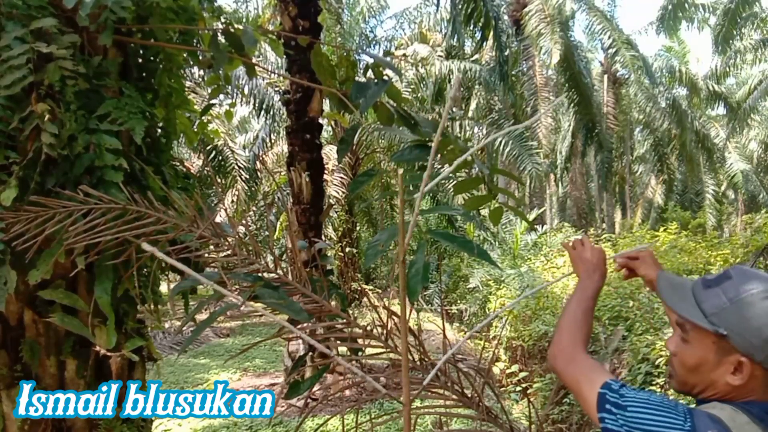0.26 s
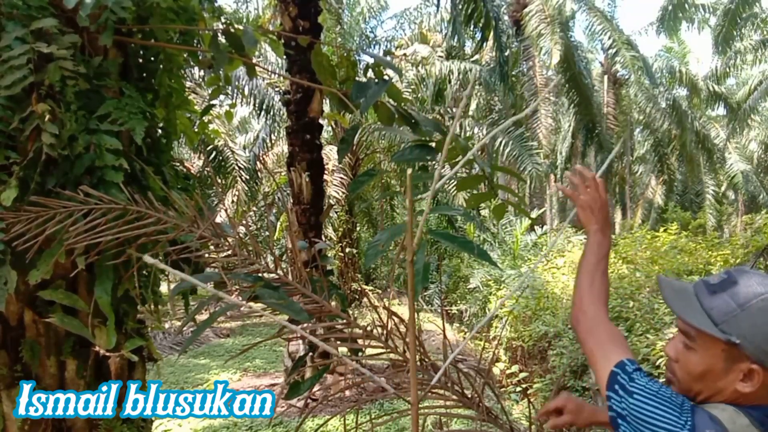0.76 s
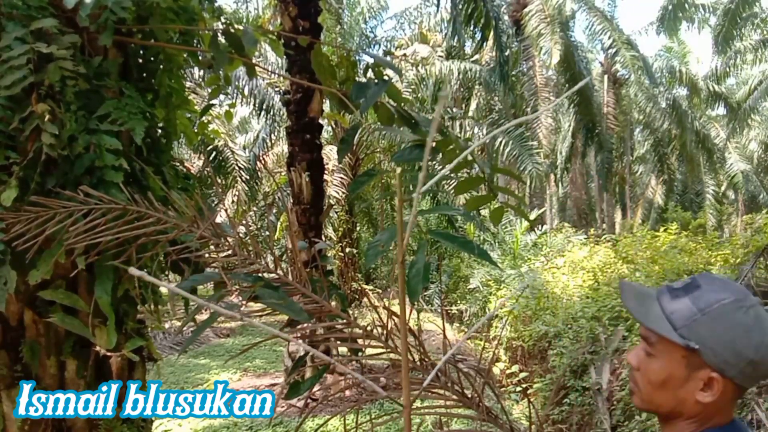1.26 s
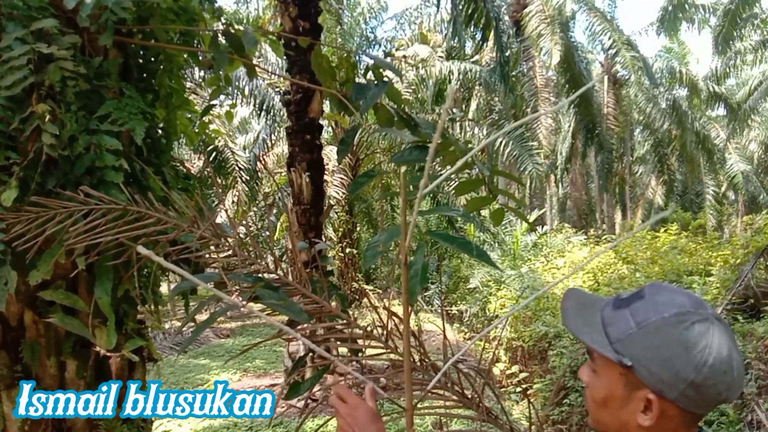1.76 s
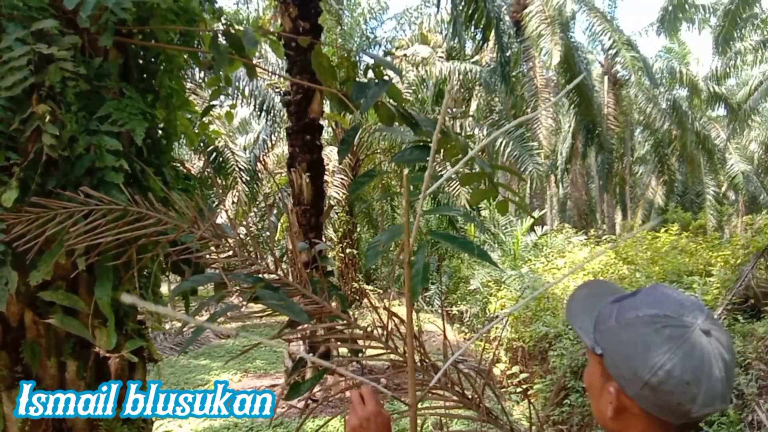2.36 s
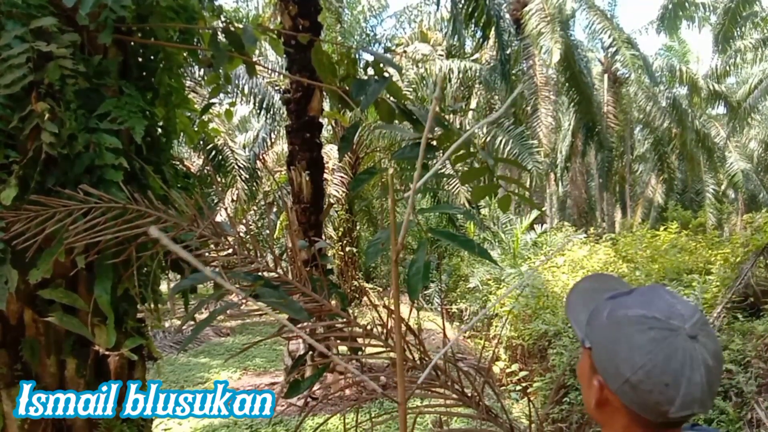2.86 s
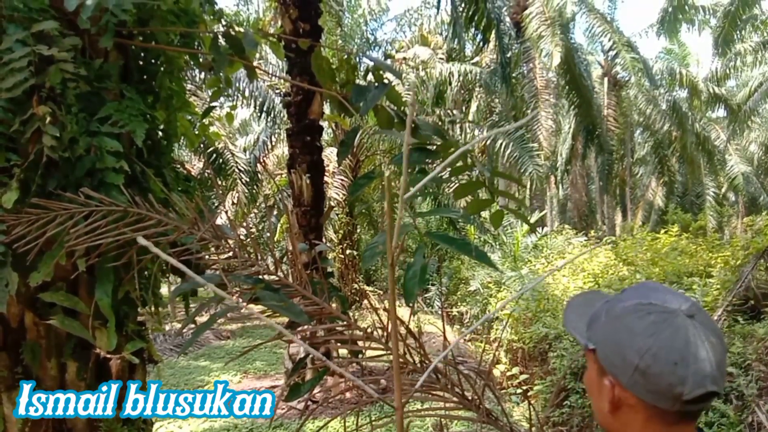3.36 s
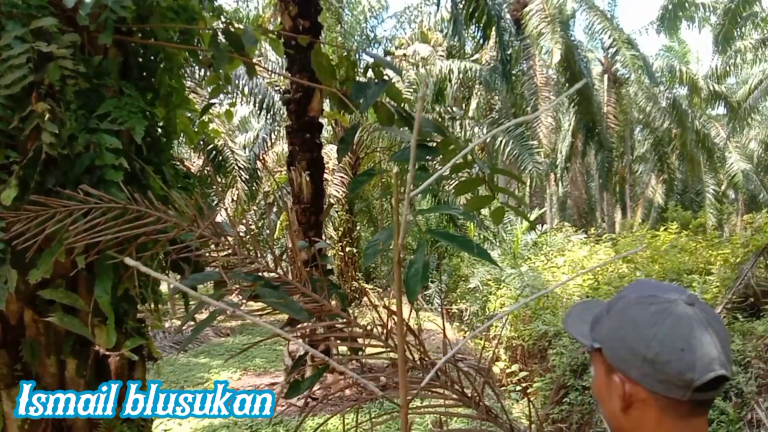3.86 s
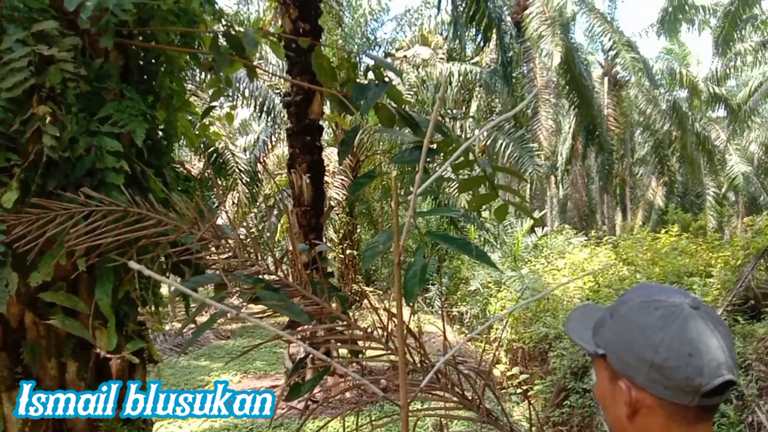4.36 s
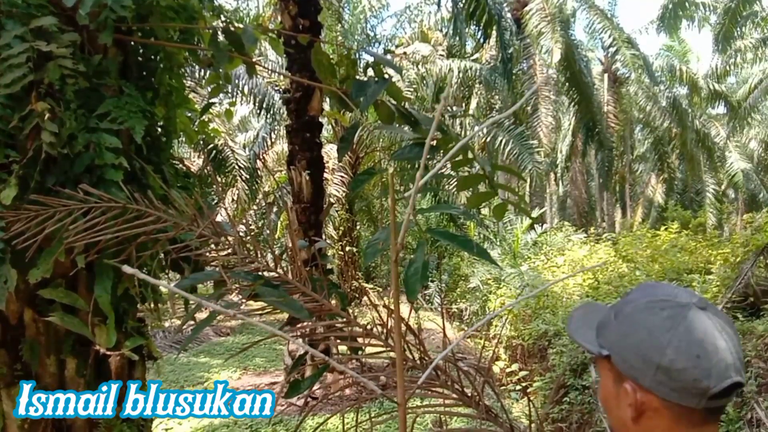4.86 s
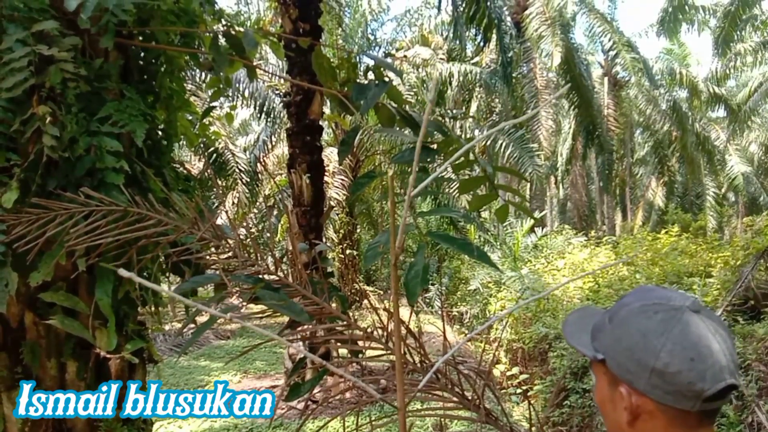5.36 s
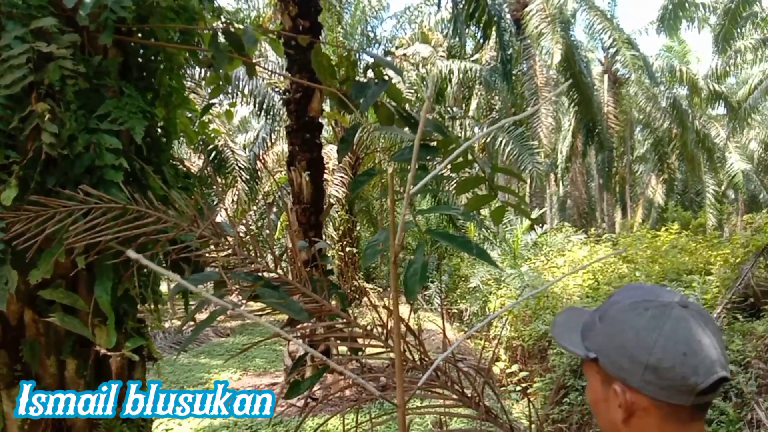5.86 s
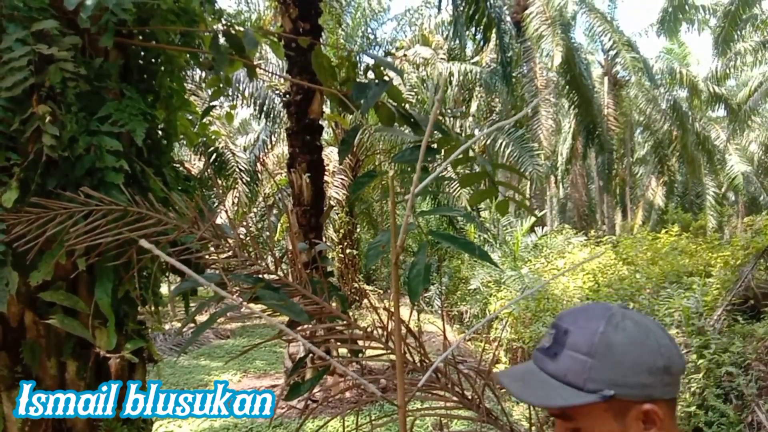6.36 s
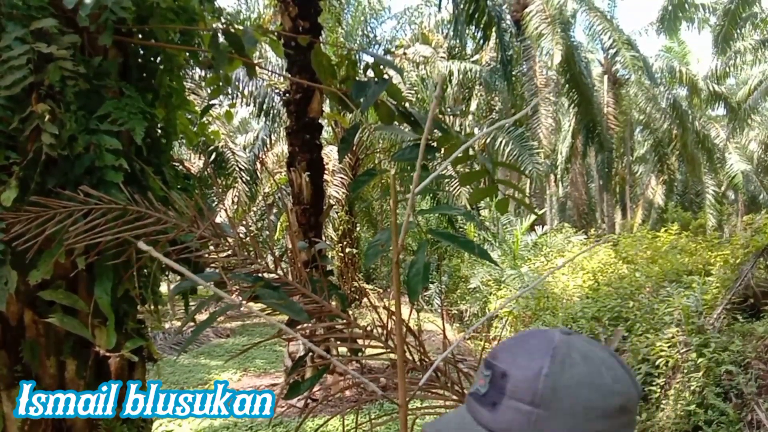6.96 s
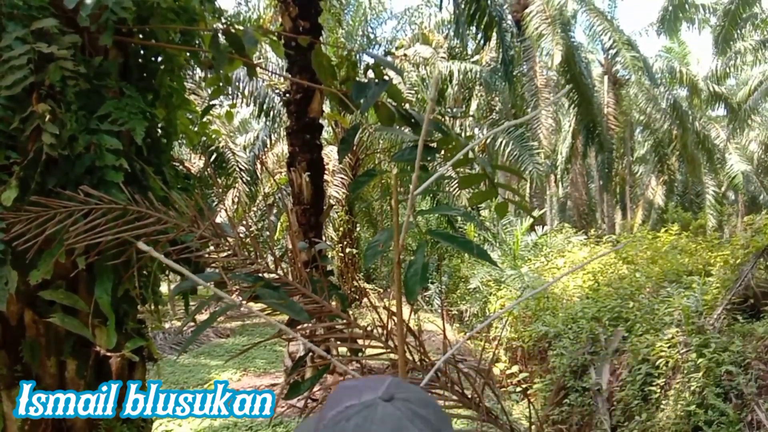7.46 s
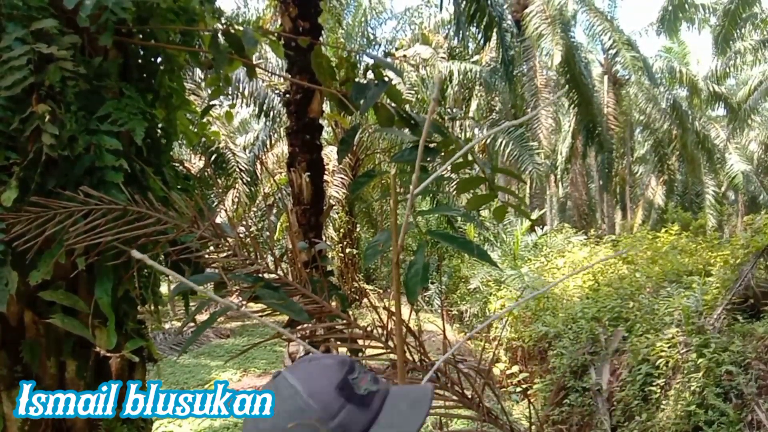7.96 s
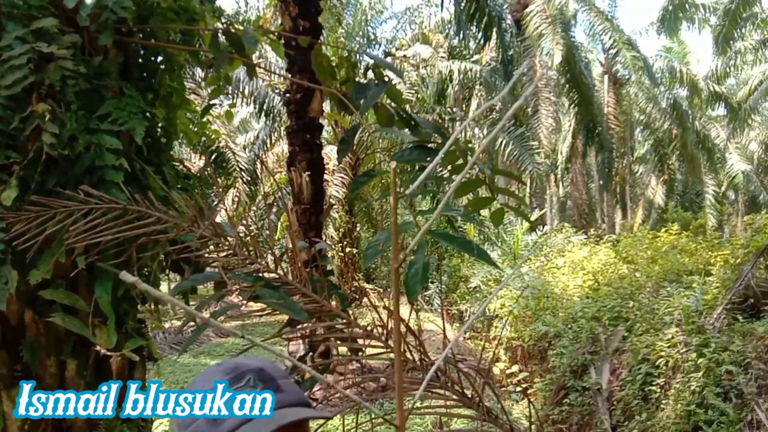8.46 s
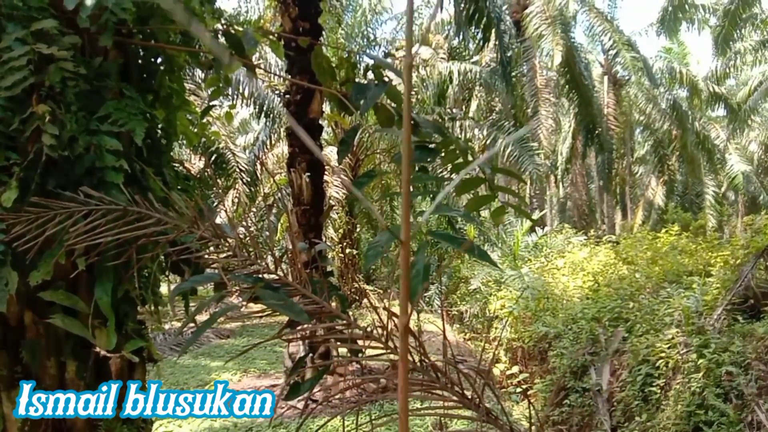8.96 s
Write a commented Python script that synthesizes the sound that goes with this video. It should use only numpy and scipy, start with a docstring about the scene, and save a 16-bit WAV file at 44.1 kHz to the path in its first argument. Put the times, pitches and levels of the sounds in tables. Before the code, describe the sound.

A quiet palm grove is heard through a hand-held microphone, with faint low air and a soft, high, steady shrill of insects throughout. A distant bird gives a thin high note followed by a lower raspy chirp at about 1 second, twice around 3.3 seconds and twice around 5.5 seconds. Dry fronds tick faintly. Soft low handling bumps and rumble come and go, mostly between 3.4 and 5 seconds, again near 6.3 and 9. At about 7.2 seconds a small loudspeaker close by cuts in with a hiss that continues to the end. From about 8 seconds it plays a songbird's quick run of five rising, gliding whistles, alternating high and lower, the first softer and the rest by far the loudest sounds. They echo briefly off the ground and trunks, finishing just after 9 seconds. A twig snaps and fronds rustle near 8.4 seconds.

```python
"""Insects shrill softly in a quiet palm plantation; a far bird calls, dry fronds rustle and hands bump
the camera. Then a small decoy loudspeaker close to the microphone cuts in with a hiss and plays a
songbird's quick run of rising whistles, which flare wherever their pitch crosses a resonance of the cone.
The ground and the trunks throw the notes back, and the microphone's limiter holds down the loudest."""
import sys
import numpy as np
from scipy import signal
from scipy.io import wavfile
from scipy.ndimage import uniform_filter1d

SR = 44100
rng = np.random.default_rng(int(sys.argv[2]) if len(sys.argv) > 2 else 0)


def to_wav(s):
    """Save 16-bit WAV."""
    ch = np.atleast_2d(s).T  # columns
    pcm = np.round(np.clip(ch, -1, 1) * 32767)  # PCM
    wavfile.write(sys.argv[1], SR, pcm.astype(np.int16))


N = 406161
T = np.arange(N) / SR


def gain_of(db):
    """Decibels to a factor."""
    return 10 ** (np.asarray(db) / 20)


def unit_rms(x):
    """Scales to an rms of 1."""
    return x / np.sqrt(np.mean(x ** 2) + 1e-20)


def at_frequency(points, hz):
    """Reads a curve on a log-frequency axis."""
    point_hz, value = np.transpose(points)
    return np.interp(np.log(hz + 1), np.log(point_hz + 1), value)


def fader(curve):
    """Points of time_s, level_db as a gain for every sample."""
    return gain_of(np.interp(T, *np.transpose(curve)))


def bell(middle_s, width_s):
    """A smooth swell of height 1."""
    return np.exp(-((T - middle_s) / width_s) ** 2)


def add(mix, start_s, sound):
    """Mixes a sound in at its start time."""
    part = mix[round(start_s * SR):][:len(sound)]
    part += sound[:len(part)]


def bandpass(x, band_hz, order=2):
    """Keeps the band between two frequencies."""
    return signal.sosfilt(signal.butter(order, band_hz, "band", fs=SR, output="sos"), x)


def drift(t, rate_hz):
    """A random wander of rms 1, no faster than rate_hz."""
    speed_hz, offset = rate_hz * rng.uniform(0.18, 1, (2, 16, 1))
    return np.sin(2 * np.pi * (speed_hz * t + rng.random(offset.shape))).sum(0) / np.sqrt(8)


def noise(spectrum, patchy_db):
    """Coloured noise of rms 1 whose strength wanders in patches of time and frequency."""
    frames, hz = N // 512 + 5, np.fft.rfftfreq(2048, 1 / SR)
    real, imag, patches = rng.standard_normal((frames, len(hz), 3)).T
    patches = uniform_filter1d(patches, size=18, axis=0)
    patches = unit_rms(uniform_filter1d(patches, size=5, axis=1))
    bins = (real + 1j * imag) * gain_of(at_frequency(spectrum, hz)[:, None] + patchy_db * patches)
    return unit_rms(signal.istft(bins, nperseg=2048, noverlap=1536)[1][:N])


def sing(shape, notes, harmonics_db, waver, brighten, rasp=0):
    """Gliding, trembling notes; harmonics grow where a note is loudest, rasp towards its end."""
    out = np.zeros(N)
    time_s, pitch_hz, shape_db = np.transpose(shape)
    for start_s, db, stretch in notes:
        t = np.arange(0, time_s[-1] * stretch, 1 / SR)
        tremble = (waver + rasp * (t / t[-1]) ** 3) * drift(t, 500)
        hz = uniform_filter1d(np.interp(t / stretch, time_s, pitch_hz), size=130) * (1 + tremble)
        phase = 2 * np.pi * np.cumsum(hz) / SR
        effort = gain_of(np.interp(t / stretch, time_s, shape_db))
        harmonics = [gain_of(harmonic_db) * np.sin(k * phase) / (1 + (k * hz / 13000) ** 24)
                     for k, harmonic_db in enumerate(harmonics_db, 1)]  # steep roll-off above 13 kHz
        wave = harmonics[0] + effort ** brighten * sum(harmonics[1:])
        add(out, start_s, np.sqrt(2) * gain_of(db) * effort * wave * signal.windows.tukey(len(t), .05))
    return out


# Ring of the grove around the microphone: frequency_hz, t60_s
GROVE_DECAY = [(1000, 0.26), (4000, 0.94), (7000, 0.55), (14000, 0.77)]

def grove(x, early_db, early_t60_s, late_db):
    """Leaves and trunks scatter a sound: a quick dense cluster, then a long faint tail."""
    t = np.arange(SR) / SR
    taps = rng.standard_normal((2, SR)) * (rng.random((2, SR)) < 3000 / SR) * (t > .008)
    early = taps[0] * gain_of(-60 * t / early_t60_s)
    hz, time_s, bins = signal.stft(taps[1], SR, nperseg=256)
    decay = gain_of(-60 * time_s / at_frequency(GROVE_DECAY, hz)[:, None])
    late = signal.istft(bins * decay, SR, nperseg=256)[1][:SR]
    early *= gain_of(early_db) / np.linalg.norm(early)
    late *= gain_of(late_db) / np.linalg.norm(late)
    return signal.fftconvolve(x, early + late)[:N]


# Air among the palms, a far low drone and a narrow hum: frequency_hz, relative_db
AIR_SPECTRUM = [(25, -26), (65, 12), (140, 13.5), (200, 0), (330, -1.5), (700, -5.5), (1100, -6.5),
                (2000, -8.5), (4000, -12.5), (6600, -33), (8500, -25.5), (11000, -21.5), (13500, -30.5),
                (15200, -22.5)]
DRONE_SPECTRUM = [(100, -32.5), (135, 11), (155, -2.5), (190, -23.5), (270, -7.5), (310, -45)]
HUM_SPECTRUM = [(950, -37.5), (1170, -13), (1265, 0.5), (1370, -18), (1700, -34)]
# The drone as it reaches the microphone: time_s, level_db
DRONE_FADER = [(0, -71), (.7, -80), (1.15, -68.5), (1.9, -71), (2.4, -93)]

def plantation_air():
    """Still air with a wavering hum in it, and a far drone that soon fades."""
    air = gain_of(-71) * noise(AIR_SPECTRUM, patchy_db=-0.4)
    drone = fader(DRONE_FADER) * noise(DRONE_SPECTRUM, patchy_db=-1)
    hum = gain_of(-81 + 2.3 * drift(T, 2.2)) * noise(HUM_SPECTRUM, patchy_db=-2)
    return air + drone + hum


# Insect chorus out in the plantation: frequency_hz, relative_db
INSECT_SPECTRUM = [(3700, -36), (4050, -25), (4400, -9.5), (4770, -0.5), (5150, -6.5), (5480, -2.5),
                   (5760, 1), (6050, -13.5), (6400, -29.5), (6850, -30.5), (7300, -18.5), (7650, -23.5),
                   (8000, -53.5)]
# Its slow swell at the microphone: time_s, level_db
INSECT_FADER = [(0.0, -64.5), (1.4, -66), (3.62, -63.5), (6.03, -64.5), (7.1, -67)]

def insects():
    """Many insects merge into one shrill, slightly flickering band."""
    flicker = gain_of(.5 * drift(T, 17))
    return flicker * fader(INSECT_FADER) * noise(INSECT_SPECTRUM, patchy_db=3.8)


# Bird syllables from far off in the palms: time_s, pitch_hz, relative_db
TSEE_SHAPE = [(0, 3950, -19), (.024, 4700, 2.5), (0.04, 5450, -5), (.044, 4100, -18), (.052, 4280, -3),
              (.072, 3760, 3), (.085, 3900, -21)]
TSEE_END_SHAPE = [(0, 3890, -14), (.013, 4204, 3), (.033, 4140, -2.5)]
CHUP_SHAPE = [(0, 2770, -19), (.027, 3016, -12), (.032, 4490, -9), (.04, 3228, -5.5), (.061, 3212, 2),
              (.074, 2964, -5.5), (.093, 2450, -17.5)]
PIP_SHAPE = [(0, 1260, -11), (.018, 1285, 4), (.042, 1260, -12)]
# The far bird's calls: start_s, tsee_level_db, chup_level_db
FAR_BIRD_CALLS = [(1.095, -74, -56.5), (3.171, -64.5, -53.5), (3.493, -61.5, -49.5), (5.392, -68.5, -55),
                  (5.712, -65.5, -52)]
# Pips from farther still: start_s, level_db, stretch_ratio
FAR_PIPS = [(2.095, -72, 1.05), (4.166, -68.5, 0.88), (5.56, -70.5, 1.4)]

def far_birds(chup_after_s=.168):
    """A thin 'tsee' with a purer end, then a lower, raspy 'chup'; faint pips; all blurred by the grove."""
    tsees = [(s, db, 1) for s, db, _ in FAR_BIRD_CALLS]
    ends = [(s + TSEE_SHAPE[-1][0], db, 1) for s, db, _ in FAR_BIRD_CALLS]
    chups = [(s + chup_after_s, db, 1) for s, _, db in FAR_BIRD_CALLS]
    calls = sing(TSEE_SHAPE, tsees, harmonics_db=[-4, 0], waver=0.019, brighten=0.87)
    calls += sing(TSEE_END_SHAPE, ends, harmonics_db=[0, -16], waver=0.017, brighten=0.6)
    calls += sing(CHUP_SHAPE, chups, [-0.5, -8.5, -25.5, -31], waver=.008, brighten=0.46, rasp=0.06)
    calls += sing(PIP_SHAPE, FAR_PIPS, harmonics_db=[0], waver=0.015, brighten=1)
    return calls + grove(calls, early_db=-5.5, early_t60_s=0.24, late_db=-14.5)


# Dry fronds around the microphone: start_s, level_db, centre_hz, length_s
FROND_RUSTLES = [(1.134, -71.5, 1990, 0.08), (3.549, -76, 1500, 0.23), (6.105, -68.5, 1500, 0.013),
                 (6.233, -68, 1610, 0.01), (6.721, -72.5, 1300, 0.18), (7.342, -54.5, 1300, 0.023),
                 (8.327, -45.5, 1455, 0.021), (8.354, -55, 1500, 0.06), (8.47, -56, 994, 0.063),
                 (8.547, -46, 1150, 0.02)]
# Twigs breaking in the grove: start_s, level_db
TWIG_SNAPS = [(1.226, -56), (5.06, -63), (6.864, -70), (8.361, -32)]

def fronds(ticks_per_s=2.5, snap_t60_s=0.0086):
    """Dry fronds tick faintly and scrape in short grainy bursts, and now and then a twig snaps."""
    ticks = gain_of(-49) * rng.uniform(-1, 1, N) * (rng.random(N) < ticks_per_s / SR)
    out = bandpass(ticks, band_hz=(1000, 4000))
    for start_s, db, centre_hz, length_s in FROND_RUSTLES:
        count = int(length_s * SR)
        grains = rng.standard_normal(count) * (rng.random(count) < .1) * signal.windows.tukey(count, .7)
        scrape = bandpass(grains, (centre_hz * 0.71, centre_hz * 1.37), order=3)
        add(out, start_s, gain_of(db) * unit_rms(scrape))
    t = np.arange(0, .02, 1 / SR)
    for start_s, db in TWIG_SNAPS:
        add(out, start_s, gain_of(db - 60 * t / snap_t60_s) * rng.standard_normal(len(t)))
    return out + grove(out, early_db=-9, early_t60_s=0.064, late_db=-10.5)


# Rumble of the hand-held camera, right at the microphone: frequency_hz, relative_db
GRIP_SPECTRUM = [(20, -51), (40, -23), (62, -1), (100, 4.5), (150, -4), (220, -17.5), (350, -34),
                 (900, -35), (3000, -42.5), (9000, -68.5)]
# Shifts of the grip: middle_s, level_db, half_length_s
GRIP_SHIFTS = [(2.543, -55, 0.1), (3.68, -56, 0.28), (4.319, -50.5, 0.13), (4.923, -56, 0.33),
               (5.943, -64, 0.58), (7.658, -63.5, 0.52), (9.096, -53.5, 0.19)]
# Soft bumps on the camera body: start_s, level_db
CAMERA_BUMPS = [(1.335, -53), (2.485, -51), (3.397, -47), (3.618, -42.5), (3.707, -43.5), (4.258, -38.5),
                (4.27, -37.5), (4.398, -38), (4.624, -41), (4.956, -39.5), (6.317, -42.5), (9.031, -37.5)]

def handling(bump_hz=97, bump_rise_s=0.0092):
    """The grip rumbles in fits as it shifts; each bump rocks the camera for a cycle or two."""
    shifting = sum(gain_of(db) * bell(middle_s, width_s) for middle_s, db, width_s in GRIP_SHIFTS)
    out = shifting * gain_of(3.64 * drift(T, 22)) * noise(GRIP_SPECTRUM, patchy_db=2.5)
    t = np.arange(0, .06, 1 / SR)
    rise = t / bump_rise_s
    bump = (rise * np.exp(1 - rise)) ** 3 * np.sin(2 * np.pi * bump_hz * t)
    for start_s, db in CAMERA_BUMPS:
        add(out, start_s, gain_of(db) * bump)
    return out


# The close loudspeaker's hiss and the wash that opens it: frequency_hz, relative_db
HISS_SPECTRUM = [(250, -27), (700, -32), (1080, -32), (1270, -11.5), (1600, -24.5), (2000, -16.5),
                 (2480, -0.5), (3150, -8), (3700, -7), (4170, 1), (4600, -8.5), (5600, -12), (6350, -25),
                 (6800, -14), (7500, -17.5), (8050, -31), (9400, -36.5), (11100, -32), (12100, -39),
                 (13900, -53.5), (15200, -38.5)]
WASH_SPECTRUM = [(1000, -37.5), (1800, -8), (2800, -13.5), (3500, -3), (4200, 5.5), (4700, -6), (5700, -12),
                 (6300, -14), (7200, -15), (8500, -36.5), (11200, -36), (15000, -42)]
# Rise and fall of the hiss, before its dips: time_s, level_db
HISS_FADER = [(7.17, -45), (7.3, -36.5), (7.65, -45), (7.85, -45.5), (8.14, -35), (9.21, -40.5)]

def speaker_hiss(on_s=7.168, dip_db=-5, wash_peak_s=7.26, rise_db_per_s=84, fall_db_per_s=45.5):
    """Hiss coloured by the cone cuts in under a wash that soon dies, and dips during each low slur."""
    switch = np.clip((T - on_s) / 0.0043, 0, 1)
    dips = gain_of(dip_db * sum(bell(s + 0.14, width_s=0.12) for s, _, _ in LOW_NOTES))
    hiss = fader(HISS_FADER) * dips * noise(HISS_SPECTRUM, patchy_db=2.5)
    wash_db = -36 - np.maximum(rise_db_per_s * (wash_peak_s - T), fall_db_per_s * (T - wash_peak_s))
    wash = gain_of(wash_db) * noise(WASH_SPECTRUM, patchy_db=4)
    return switch * (hiss + wash)


# Response of the loudspeaker's small cone: frequency_hz, gain_db
CONE_RESPONSE = [(3000, -10.5), (3480, -12), (3615, -2), (3720, -9), (3950, 5), (4160, 4.5), (4420, -10),
                 (5000, -9), (5750, -16), (5950, -6), (6250, -12), (6700, 0.5), (7150, -10)]

def through_cone(contour, attack_s, release_s, edge_db=-16, sag_db_per_s=27.5):
    """A note swells, sags and fades, flaring at the cone's resonances: time_s, pitch_hz, relative_db."""
    time_s, pitch_hz = np.transpose(contour)
    t = np.arange(0, time_s[-1], 1 / SR)
    hz = np.interp(t, time_s, pitch_hz)
    edges = np.maximum(1 - t / attack_s, 0) + np.maximum(1 - (time_s[-1] - t) / release_s, 0)
    shape_db = at_frequency(CONE_RESPONSE, hz) + edge_db * edges - sag_db_per_s * t
    return np.transpose([t, hz, shape_db])


# The songbird's whistles, played close to the microphone: time_s, pitch_hz
LOW_GLIDE = [(0, 2974), (.06, 3847), (.088, 4180), (.106, 3638), (.115, 3816), (.123, 4460), (.16, 4685),
             (.168, 5050), (.175, 5840), (.184, 5260), (.204, 4740), (.225, 3888)]
HIGH_GLIDE = [(0, 4390), (.01, 5790), (.026, 5790), (.052, 6490), (.07, 6760), (.086, 6645), (.101, 6250)]
SECOND_GLIDE = [(0, 6450), (.009, 6880), (.02, 7150), (.04, 7126)]
# The run of notes going into the cone: start_s, level_db, stretch_ratio
LOW_NOTES = [(8.149, -6.5, 1.0), (8.675, -6.5, 1.035)]
HIGH_NOTES = [(7.95, -19, 0.94), (8.470, -7, 0.97), (9.002, -6, 0.94)]
# Echoes off the ground and the nearest trunks: delay_s, gain_db
NEAR_ECHOES = [(.00442, -8), (0.0122, -18.5), (.031, -17), (0.044, -25)]

def decoy_song(harmonics_db=(0, -38.5, -42), second_lead_s=.0035, second_db=-14.5):
    """Low and high slurs alternate; the other side of the syrinx joins just ahead of each high one."""
    low_shape = through_cone(LOW_GLIDE, attack_s=0.026, release_s=0.0063)
    high_shape = through_cone(HIGH_GLIDE, attack_s=.012, release_s=0.012)
    second_shape = through_cone(SECOND_GLIDE, attack_s=0.013, release_s=.03)
    second_notes = [(s - second_lead_s, db + second_db, stretch) for s, db, stretch in HIGH_NOTES]
    low = sing(low_shape, LOW_NOTES, harmonics_db, waver=0.0027, brighten=.15)
    high = sing(high_shape, HIGH_NOTES, harmonics_db, waver=0.0038, brighten=.55)
    second = sing(second_shape, second_notes, harmonics_db=[0], waver=0.022, brighten=1)
    # the notes drive the cone into a faint treble fizz, the high ones most
    drive = gain_of(-45.5) * low + gain_of(-34) * high
    fizz = bandpass(drive * rng.standard_normal(N), band_hz=(7000, 11500))
    direct = low + high + second + fizz
    out = direct + grove(direct, early_db=-7.5, early_t60_s=0.082, late_db=-11.5)
    for delay_s, db in NEAR_ECHOES:  # each echo beats against the gliding note
        add(out, delay_s, gain_of(db) * direct)
    return out


def scene():
    """Everything meets at one hand-held microphone among the palms."""
    background = plantation_air() + insects() + far_birds() + fronds()
    return (background + handling() + speaker_hiss() + decoy_song())[None]


def record(dry, limit_db=-8, recover_db_per_s=130, overload=0.15, cutoff_hz=15550):
    """A fast limiter ducks everything under the loudest notes; crests bend slightly; the top is cut."""
    power_db = 10 * np.log10(abs(uniform_filter1d(dry[0] ** 2, size=60)) + 1e-12)
    recovery_db = T * recover_db_per_s
    held_db = np.maximum.accumulate(power_db + recovery_db) - recovery_db
    over_db = np.maximum(held_db - limit_db, 0)
    ducked = dry / gain_of(0.88 * uniform_filter1d(over_db, size=100))
    bent = ducked * (1 - overload * ducked ** 2)
    lowpass = signal.firwin(511, cutoff_hz, window=("kaiser", 9), fs=SR)
    return signal.oaconvolve(bent, lowpass[None], "same")


dry = scene()
out = record(dry)
to_wav(out)
```